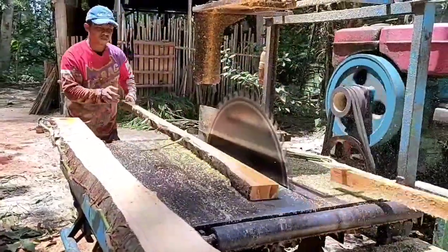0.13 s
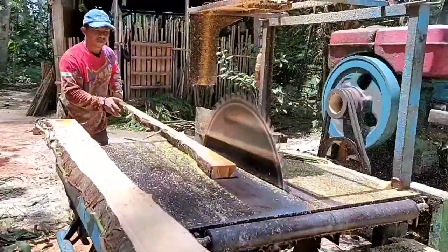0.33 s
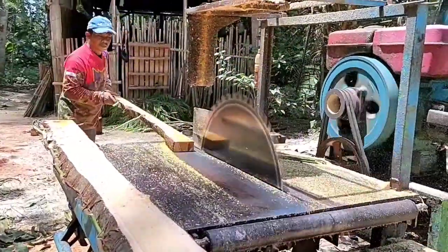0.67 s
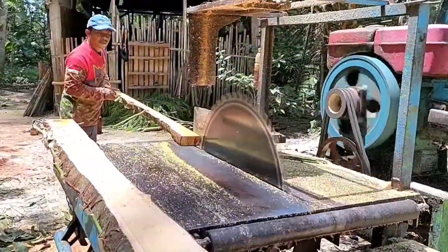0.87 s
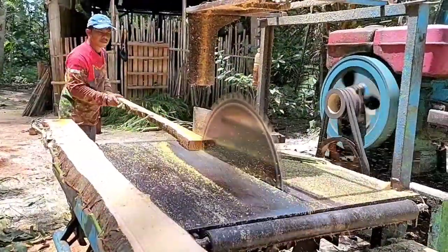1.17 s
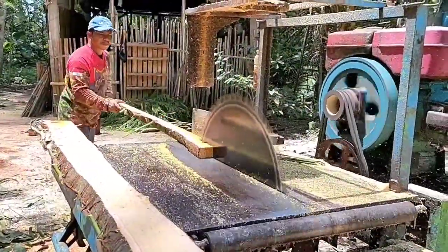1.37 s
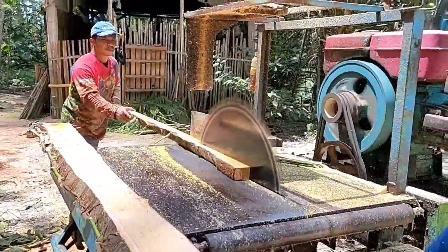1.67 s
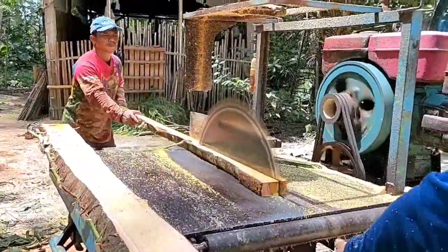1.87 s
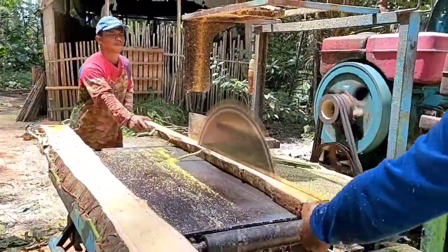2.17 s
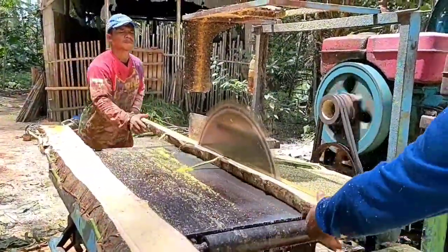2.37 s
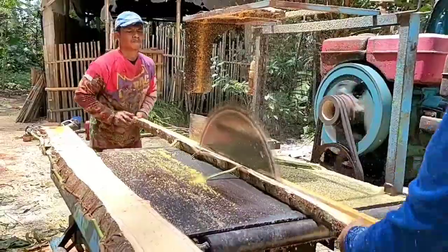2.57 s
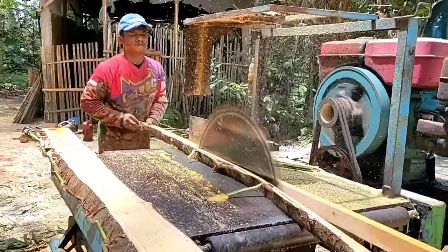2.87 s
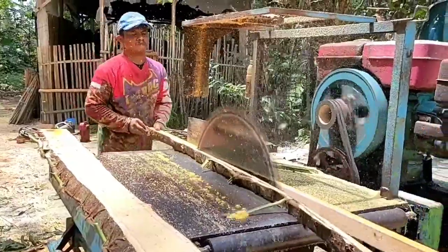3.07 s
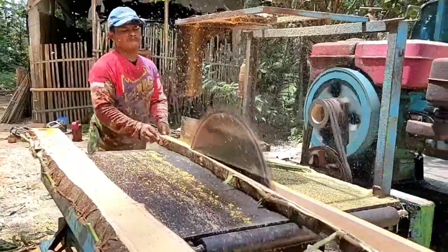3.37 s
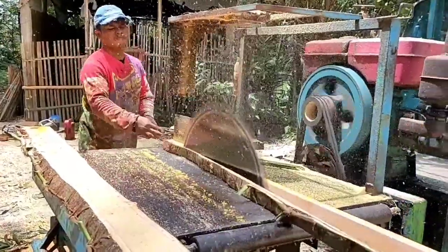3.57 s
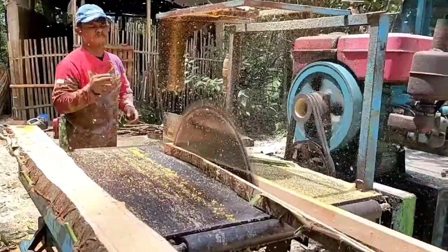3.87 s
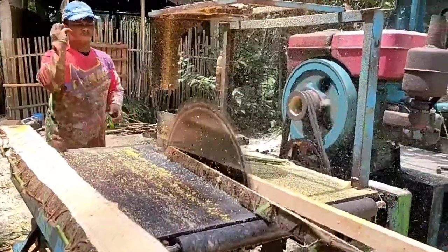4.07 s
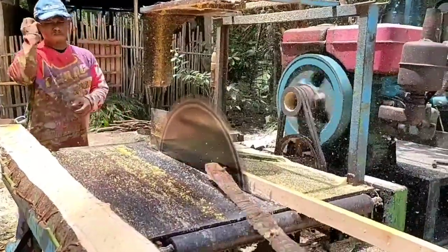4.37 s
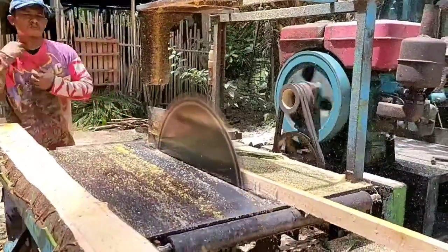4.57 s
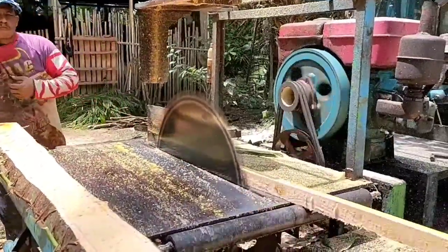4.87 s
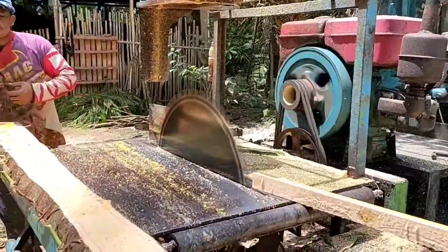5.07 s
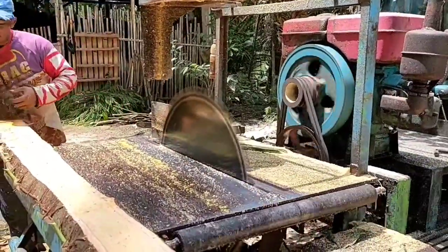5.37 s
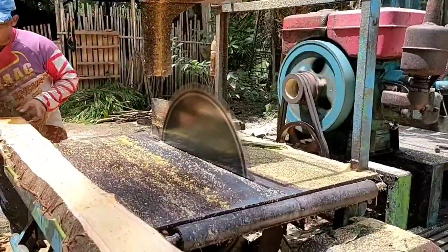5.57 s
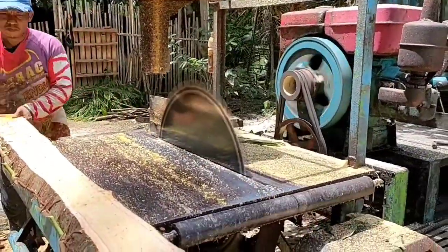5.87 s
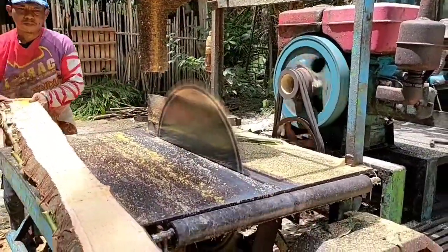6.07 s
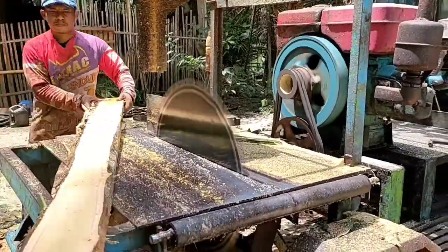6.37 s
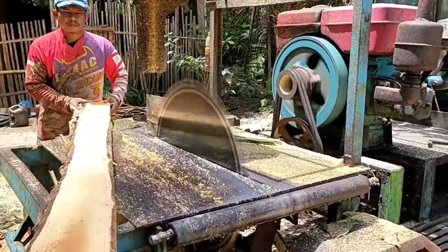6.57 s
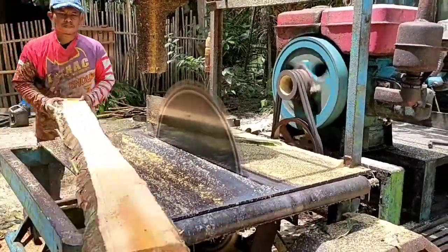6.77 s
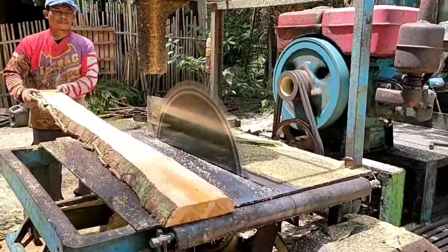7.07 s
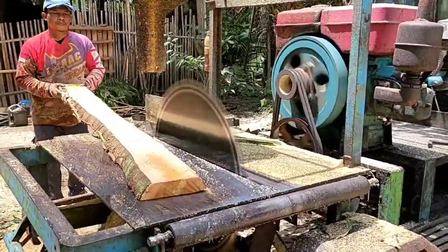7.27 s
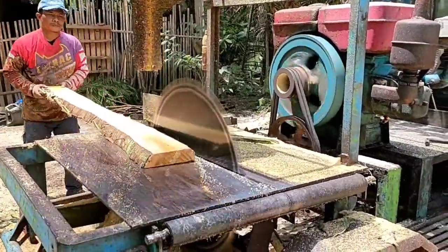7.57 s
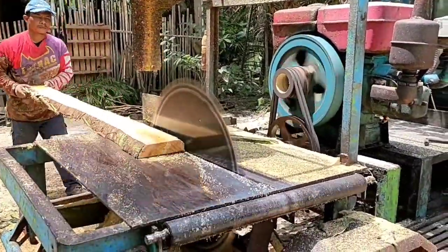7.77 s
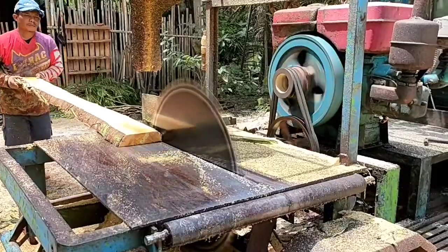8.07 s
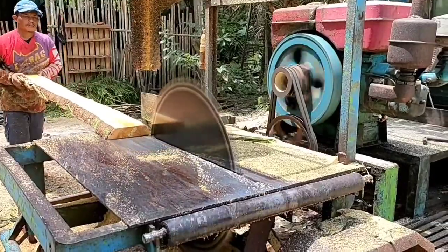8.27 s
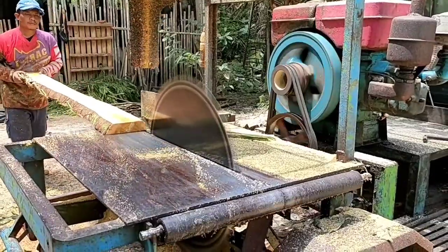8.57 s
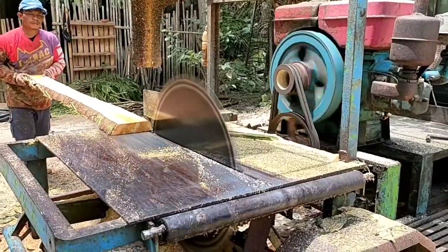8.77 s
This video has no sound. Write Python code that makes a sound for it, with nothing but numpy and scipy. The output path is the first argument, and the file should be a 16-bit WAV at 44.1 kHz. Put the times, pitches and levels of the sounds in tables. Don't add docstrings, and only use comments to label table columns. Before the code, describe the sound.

Open-air sawmill: hollow exhaust puffs and sharp pops, a harsh high saw cut with dusty hiss, then loud engine clatter and plank knocks.

```python
import sys
import numpy as np
from scipy import signal
from scipy.fft import rfft, irfft, next_fast_len
from scipy.io import wavfile
from scipy.ndimage import uniform_filter1d

SR = 44100
rng = np.random.default_rng(int(sys.argv[2]) if len(sys.argv) > 2 else 0)


def pcm_store(signal):
    levels = np.round(np.clip(np.atleast_2d(signal), -1, 1) * 32767)
    wavfile.write(sys.argv[1], SR, levels.astype(np.int16).T)


def makeup_ratio(level_db):
    decades = np.asarray(level_db, float) / 20
    return 10 ** decades


N = 393813
SIZE = next_fast_len(N + 8192)
HZ = np.maximum(np.arange(SIZE // 2 + 1) * SR / SIZE, 1)
LEFT_LAG = 8
CUT_S, ENTER_S, LEAVE_S = (1.36, 3.82), 0.023, 0.14
# start_s, bite_level_db
FEED = [(1.36, -17), (1.41, -16.5), (1.5, -17), (1.72, -18.5), (1.95, -17), (2.25, -19), (2.42, -17.5),
        (3.1, -17), (3.35, -18), (3.5, -19.5), (3.65, -19), (3.82, -18.5)]


def response(points, column=1, rings=()):
    table = np.array(points, float)
    gain_db = np.interp(np.log(HZ), np.log(table[:, 0]), table[:, column])
    for hz, width, db in rings:
        gain_db = gain_db + db / (1 + (2 * (HZ - hz) / width) ** 2)
    cepstrum = irfft(gain_db * np.log(10) / 20, SIZE)
    cepstrum[1:SIZE // 2] *= 2
    cepstrum[SIZE // 2 + 1:] = 0
    return np.exp(rfft(cepstrum))


def stereo(direct, spread, colour, alike_hz, rings=(), least=0.13):
    alike = np.clip(least + (1 - least) / (1 + (HZ / alike_hz) ** 2), 0, 1)
    lag = [np.exp(-2j * np.pi * HZ * LEFT_LAG / SR), 1]
    sides = []
    for c in range(2):
        straight = np.sqrt(alike) * lag[c] * rfft(direct, SIZE)
        echoes = np.sqrt(1 - alike) * rfft(spread[c], SIZE)
        sides.append(response(colour, 1 + c, rings) * (straight + echoes))
    out = irfft(sides, SIZE)[:, :N]
    return out / np.sqrt(np.mean(out ** 2))


def strike(times, gains, shape, lead_s):
    train = np.zeros(N + SR)
    np.add.at(train, np.round(np.asarray(times) * SR).astype(int), gains)
    start = int(lead_s * SR)
    return signal.fftconvolve(train, shape)[start:start + N]


def walk(rate):
    k = int(SR / rate)
    return 1.64 * uniform_filter1d(np.repeat(rng.standard_normal(N // k + 1), k), k)[:N]


def grit(rate, scatter_db):
    chance = rng.random((2, N))
    size = makeup_ratio(-scatter_db * np.log(1 - .999 * chance[1]))
    clicks = (chance[0] < rate / SR) * size * rng.standard_normal(N)
    return clicks / np.sqrt(np.mean(clicks ** 2))


def bump(t, at, width):
    return np.exp(-.5 * ((t - at) / width) ** 2)


def band(x, lo_hz, hi_hz):
    return signal.sosfilt(signal.butter(2, [lo_hz, hi_hz], "band", fs=SR, output="sos"), x)


def held(t, start, end, attack, release):
    return np.interp(t, [start - attack, start, end, end + release], [0, 1, 1, 0])


def firings():
    # start_s, peak_db, crack_above_pop_db, gain_duck_db
    free = [(0.266, -32, 14, -8.5), (5.273, -35, 6, -2), (0.3438, -19.5, 11.5, -2),
            (1.0203, -20, 7.5, -6.5), (4.067, -18.5, 5, -3.5), (4.1403, -18, 9, 3.5),
            (4.591, -13.5, 5.5, -7.5), (4.6532, -16, 6, 4), (5.328, -13, 3, -1), (5.4119, -15.5, 5, -7.5),
            (5.494, -15.5, 0.5, -1.5), (6.0185, -12.5, 2.5, -7.5), (6.096, -13, 6.5, 0),
            (6.156, -13, -1, -6), (6.6863, -14.5, 4, -7.5), (6.7682, -17, 8.5, -6), (7.446, -16, 5.5, -12),
            (7.5196, -15.5, 9, -5.5), (8.1948, -14, 2, -12.5), (8.2773, -15, 11.5, -4.5)]
    # start_s, peak_db, crack_above_pop_db
    loaded = [(1.7104, -23.5, 10), (1.7948, -24.5, 10), (1.934, -31, 5), (2.098, -24, 9),
              (2.1767, -23, 12.5), (2.2378, -27, -11), (2.403, -22, 0), (2.545, -32, 8), (2.629, -20.5, 8),
              (2.699, -36, -4), (2.778, -30, 6), (2.9303, -22.5, 3), (3.159, -22.5, -1), (3.225, -24.5, 11),
              (3.308, -21.5, 10.5), (3.609, -24, 6), (3.6912, -22.5, 8), (3.7546, -23, 8.5)]
    loaded_duck_db = -0.54
    return np.transpose(free + [row + (loaded_duck_db,) for row in loaded])


def gain_control():
    t = np.arange(0, .5, 1 / SR)
    duck = np.clip((t - .008) / 0.009, 0, 1) * np.exp(-(t / 0.13) ** 1.8)
    s, _, _, duck_db = firings()
    return makeup_ratio(0.61 * strike(s, duck_db, duck, 0))


def puffs():
    # first_s, last_s, peak_db
    coasts = [(0.068, .2283, -20), (.451, .451, -20.5), (0.5122, .6759, -19), (0.7446, .9022, -20),
              (0.965, .966, -21), (1.1297, 1.3493, -21), (3.864, 4.0124, -23), (4.236, 4.2354, -19.5),
              (4.316, 4.3918, -15), (4.453, 4.5354, -14.5), (4.758, 4.8412, -18), (4.8959, 5.0612, -15),
              (5.1337, 5.2168, -19), (5.58, 5.7428, -15), (5.807, 5.9628, -15.5), (6.2628, 6.3427, -13),
              (6.4033, 6.569, -15), (6.6312, 6.6304, -15), (6.871, 6.87, -17.5), (6.932, 7.013, -13.5),
              (7.0767, 7.2416, -14), (7.306, 7.3923, -15.5), (7.607, 7.769, -13), (7.845, 7.8438, -16),
              (7.9078, 7.9902, -15), (8.063, 8.144, -15.5), (8.373, 8.373, -14), (8.443, 8.5241, -15),
              (8.588, 8.7479, -16), (8.812, 8.8945, -17)]
    # first_s, last_s, peak_db
    loaded_coasts = [(1.4966, 1.5822, -27.5), (1.639, 1.6398, -27), (1.877, 1.878, -37),
                     (2.0455, 2.0476, -31.5), (2.3465, 2.3473, -25), (2.488, 2.489, -27),
                     (2.848, 2.8475, -24), (3.018, 3.1033, -28.5), (3.409, 3.551, -49)]
    stroke_s = .079
    runs = []
    for first, last, db in coasts + loaded_coasts:
        for s in np.linspace(first, last, round((last - first) / stroke_s) + 1):
            runs.append((s, db))
    s, db = np.transpose(runs)
    return s, db + 1.5 * 20 * np.log10(gain_control()[(s * SR).astype(int)])


def exhaust():
    t = np.arange(-.04, .08, 1 / SR)

    def ring(at, hz, width):
        return bump(t, at, width) * np.cos(2 * np.pi * hz * (t - at))

    def n_wave(at, rise, fall, under):
        return bump(t, at, rise) - under * bump(t, at + 2.62 * rise, fall)

    puff = 1.175 * ring(-0.00018, 257.0, 0.0029) + 0.27 * ring(0.00053, 593, 0.0054)
    puff += 0.23 * n_wave(-0.027, 0.00097, 0.0014, 0.68) - 0.19 * ring(-0.015, 154, 0.0055)
    puff += 0.2 * ring(0.00744, 276, 0.0055) - 0.47 * ring(0.02113, 231, 0.0017)
    puff += 0.07 * ring(0.0103, 97, 0.017)
    pop = n_wave(0, 0.0007, 0.001, 0.95)
    pop += 0.36 * ring(0.0104, 172, 0.002) - 0.085 * ring(0.0185, 180, 0.0028) + 0.31 * ring(0.029, 256, 0.0041)
    pop += 0.095 * ring(0.013, 68, 0.012)
    coast, pops = puffs(), firings()
    both = strike(coast[0], makeup_ratio(coast[1]), puff, .04) + strike(pops[0], makeup_ratio(pops[1]), pop, .04)
    return np.array([makeup_ratio(-1.3) * np.roll(both, LEFT_LAG // 2), makeup_ratio(-2.7) * np.roll(both, -LEFT_LAG // 2)])


def cracks():
    t = np.arange(-.03, .06, 1 / SR)
    burst = np.where(t < .002, bump(t, 0.00081, 0.0011), np.exp(-(t - .002) / 0.0098))
    burst = burst + 0.05 * bump(t, -0.008, 0.0032)
    burst = burst + 0.98 * bump(t, 0.0023, 0.00022)
    s, db, crack_db, _ = firings()
    noise = rng.standard_normal((3, N))
    # pitch_hz, left_db, right_db
    colour = [(307, -21.0, -13), (1230, 1.0, 2.0), (2530, 2.0, 4.0), (4600, 9.0, 8.5),
              (6420, -9.5, -10.0), (14700, -14.0, -20.5)]
    gas = strike(s, makeup_ratio(db + crack_db), burst, .03)
    return makeup_ratio(-4.5) * gas * stereo(noise[0], noise[1:], colour, 3300.0)


def clatter(t):
    # start_s, level_db
    engine = [(0, -26), (.4, -27.5), (.9, -26.5), (1.2, -29), (1.35, -25), (1.5, -36.5), (2.1, -34.5),
              (2.4, -28.5), (3.1, -32.5), (3.6, -30.5), (3.85, -29.5), (4.05, -25.5), (4.24, -24.5),
              (4.35, -20), (4.5, -19.5), (8.93, -19.5)]
    # low_hz, high_hz, before_stroke_s, swell_length_s, swell (ratio), click_share (ratio), flicker_db
    parts = [(124, 453, 0.0016, 0.0065, 0.28, 0.087, 2.5), (459, 865, 0.0025, 0.0065, 0.33, 0.39, 1.3),
             (877, 2010, 0.01, 0.0078, 0.39, 0.41, 1.66), (2130, 3260, 0.0088, 0.0072, 0.17, 0.42, 1.6),
             (3310, 5020, 0.02, 0.0054, 0.61, 0.45, 1.7), (4960, 22000, 0.007, 0.015, 0.24, 0.28, 1.5)]
    # pitch_hz, left_db, right_db
    colour = [(57.3, -13.5, -15.5), (176, -10, -7.5), (296, -5.5, -7), (365, -19, -16.5), (560, -7, -7.5),
              (1287, -6.5, -10.5), (1720, -3.5, -5.5), (2590, -12.5, -11.5), (3180, -10.5, -11),
              (4060, -4, -12), (4540, -13.5, -12.5), (5500, -19.5, -20.5), (7160, -18.5, -18.5),
              (14000, -29, -31)]
    # pitch_hz, width_hz, above_colour_db
    block_rings = [(180, 16, 6), (440, 60, 3.5), (630, 45, 3.5), (771, 48, 4.5), (1060, 39, 6),
                   (1212, 103, 6), (1320, 49, 6), (3625, 56, 10.5), (3870, 39, 4.5), (3970, 100, 4.5),
                   (5810, 53, 9), (6160, 96, 7)]
    around = np.arange(-.06, .06, 1 / SR)
    strokes = np.sort(np.r_[puffs()[0], firings()[0]])
    force = makeup_ratio(1.1 * rng.standard_normal((len(strokes), len(parts))))
    drive = 0
    for k, (lo_hz, hi_hz, lead, length, swell, clicks, flicker_db) in enumerate(parts):
        gate = 1 + strike(strokes, force[:, k], swell * bump(around, -lead, length), 0.058)
        gate = gate * makeup_ratio(flicker_db * walk(40))
        rattle = rng.standard_normal((3, N)) + clicks * grit(1500., 2.1)
        drive = drive + band(gate * rattle, lo_hz, hi_hz)
    level = makeup_ratio(np.interp(t, *np.transpose(engine)))
    return level * stereo(drive[0], drive[1:], colour, 1350.0, block_rings, least=0.38)


def work(t):
    def blend(off, on, share):
        return off + (on - off) * share

    cut, push = held(t, *CUT_S, ENTER_S, LEAVE_S), np.interp(t, *np.transpose(FEED))
    whirr = blend(-52, blend(-18.5, -28, cut), held(t, 0, 3.88, 1, 0.0082))
    graze = -54 + 20 * held(t, CUT_S[0] - ENTER_S, CUT_S[1] + 0.028, 0.26, 0.026)
    spray = -28 + 4 * (push + 18) + 4.5 * bump(t, CUT_S[0] + 0.25, 0.085)
    dust_off_db = -48
    offcut = blend(dust_off_db, -25.5 + .6 * walk(30), held(t, 3.9, 4.2, 0.064, 0.077))
    dust = np.maximum(blend(dust_off_db, spray, cut), offcut)
    return whirr, blend(graze, push, cut), dust


def saw(whirr_db, bite_db, dust_db):
    # pitch_hz, left_db, right_db
    whirr_colour = [(1250, -36, -15.5), (2017, -16, -8.5), (2670, -17, -5), (3320, -44, -1),
                    (4620, -24, -5), (5120, -38.5, -5.5), (6130, -24, -15), (7030, -39, -42),
                    (8600, -22.5, -53), (14040, -42, -58)]
    # pitch_hz, left_db, right_db
    bite_colour = [(1190, -53, -50), (1970, -43, -19), (2850, -60, -6.5), (3300, -66, -3), (3960, -30, -6),
                   (4940, -5.5, 2), (5130, -22, -1), (5570, -23, -13.5), (6650, -50, -34),
                   (14600, -32, -29)]
    # pitch_hz, left_db, right_db
    dust_colour = [(1180, -7, -15.5), (2000, 0, -0.5), (2890, -5, -17), (4040, 6, -22), (4660, 0.5, 3),
                   (5800, 0.5, -2), (6500, -9.5, -12), (8500, -5.5, -10), (10600, -9.5, -19),
                   (11370, -20, -8), (12860, -9, -11.5), (14300, -16, -18.5)]
    # pitch_hz, width_hz, above_colour_db
    plate = [(3590, 34, 5.5), (3730, 43, 3), (4040, 64, 7), (4860, 72, 2), (5100, 64, 8), (4300, 65, 6),
             (4620, 100, 8.5)]
    edges_hz = [600, 2400, 3000, 3400, 3700, 4000, 4200, 4400, 4600, 4800, 5000, 5200, 5500, 6200, 7500, 16000]
    chips = .4 * grit(2000., 1.9)
    drive = 0
    for lo, hi in zip(edges_hz, edges_hz[1:]):
        flicker = makeup_ratio(1.7 * walk(45) + .7 * walk(14))
        drive = drive + band(flicker * (rng.standard_normal((3, N)) + chips), lo, hi)
    layers = [(whirr_db, whirr_colour, plate), (bite_db, bite_colour, plate), (dust_db, dust_colour, ())]
    out = 0
    for k, (db, colour, rings) in enumerate(layers):
        own = np.roll(drive, k * N // 3, axis=1)
        out = out + makeup_ratio(db) * stereo(own[0], own[1:], colour, 1200., rings, least=0.42)
    return out


def mist(t):
    push = np.interp(t, *np.transpose(FEED)) + 18
    db = -45 + 4.4 * push + 11 * bump(t, CUT_S[0] + 0.17, 0.15) + .7 * walk(25)
    noise = rng.standard_normal((3, N))
    return held(t, *CUT_S, ENTER_S, LEAVE_S) * makeup_ratio(db) * band(noise[0] + noise[1:], 7800.0, 15000.)


def taps(events, rise_s, fall_s, trim_db, left_db, rough):
    t, out = np.arange(0, .05, 1 / SR), np.zeros(N + SR)
    shape = (1 - np.exp(-t / rise_s)) * np.exp(-t / fall_s)
    for s, db, hz in events:
        i = int(s * SR)
        out[i:i + len(t)] += makeup_ratio(db + trim_db) * shape / shape.max() * np.sin(2 * np.pi * hz * t)
    rattle = uniform_filter1d(rng.standard_normal((2, N)), size=16, axis=1) * np.sqrt(16)
    out = out[:N] * (1 + rough * rattle)
    return np.array([makeup_ratio(left_db) * np.roll(out[0], LEFT_LAG), makeup_ratio(-left_db) * out[1]])


def engine_taps():
    # start_s, peak_db, pitch_hz
    ticks = [(4.2911, -19, 3850), (4.5795, -13, 4300), (4.7117, -21, 3590), (4.773, -10, 3800),
             (4.8096, -19, 3930), (5.1088, -23, 4040), (5.1934, -21, 3880), (5.3124, -14, 4040),
             (5.3974, -10, 3860), (5.6436, -11, 3800), (5.7982, -7, 3930), (6.0796, -8, 3940),
             (6.2546, -26, 4020), (6.4423, -7, 3910), (6.6064, -12, 3780), (6.755, -13, 4000),
             (6.977, -10, 3900), (7.1008, -4, 3640), (7.193, -10, 3840), (7.2812, -16, 4040),
             (7.3293, -6, 3970), (7.3482, -8, 4010), (7.4245, -5, 3930), (7.4344, -4, 4050),
             (7.867, -19, 4000), (7.8825, -4, 3960), (7.9673, -19, 3880), (8.1225, -13, 3900),
             (8.2626, -12, 3970), (8.418, -21, 3900), (8.4347, -8, 3840)]
    # start_s, peak_db, pitch_hz
    clacks = [(3.6924, -14, 4040), (4.14, -15, 4720), (4.5946, -11, 4240), (5.412, -10, 4100),
              (6.018, -7, 4040), (6.0945, -6, 4420), (6.1552, -6, 3980), (6.6876, -10, 4340),
              (6.77, -6, 4080), (7.4447, -6.5, 4040), (7.5213, -18, 4100), (8.1958, -7.5, 4070),
              (8.278, -17, 4180)]
    # start_s, peak_db, pitch_hz
    clanks = [(4.526, -14, 590), (4.578, -12, 1100), (4.64, -19, 780), (4.721, -11, 763), (4.75, -10, 1285),
              (4.832, -15, 589), (4.898, -10.5, 1060), (5.119, -10, 1190), (5.31, -18, 750),
              (5.382, -20, 1250), (5.476, -18, 750), (5.648, -17, 645), (5.734, -15, 1330),
              (5.796, -11, 1220), (5.879, -14, 1100), (5.909, -13.5, 600), (5.95, -17, 1210),
              (6.101, -19, 1200), (6.136, -11, 750), (6.318, -27, 1160), (6.335, -11.5, 584),
              (6.478, -9, 1220), (6.557, -13, 1210), (6.751, -16, 760), (6.83, -18, 767),
              (6.87, -16.5, 678), (6.93, -16, 598), (7.04, -18, 727), (7.066, -13.5, 1106),
              (7.508, -17, 1110), (7.669, -13, 1040), (7.749, -15, 1060), (7.813, -14, 725),
              (7.882, -11, 1200), (8.06, -17, 1210), (8.195, -12, 1600), (8.261, -18.5, 1260),
              (8.364, -11, 1263), (8.431, -14, 1220), (8.454, -15, 1090), (8.513, -18, 1020),
              (8.669, -11, 600), (8.785, -12, 1230), (8.843, -14, 1190)]
    gear = taps(ticks, 0.00064, .0025, -5.5, 2.3, 0.22) + taps(clacks, .0006, 0.0021, -3.5, 0.77, 0.4)
    return gear + taps(clanks, 0.0023, 0.0058, -6, 0.78, 0.11)


def timber_taps():
    # start_s, peak_db, pitch_hz
    squeals = [(0.0218, -10, 3570), (0.1226, -16, 4700), (0.5494, -11, 3790), (0.5894, -11.5, 4450),
               (0.6194, -12, 3980), (0.6509, -9, 4100), (0.7696, -16, 3800), (0.7994, -10, 3870),
               (0.8544, -14, 3580), (0.8794, -16, 3760), (0.9263, -15, 4080), (1.1598, -20, 4070),
               (1.2216, -13.5, 3640), (1.3713, -13, 4060), (2.5147, -11, 4940), (2.5421, -13, 4620),
               (2.6514, -13, 4660), (3.493, -14, 5000), (3.8407, -18, 5180)]
    # start_s, peak_db, pitch_hz
    thuds = [(2.017, -33, 175), (2.259, -29, 262), (2.313, -28, 80.7), (2.692, -30, 129), (2.794, -29, 272),
             (2.984, -30, 221), (3.067, -32, 86.1), (3.388, -39, 180), (3.477, -41, 215), (3.54, -37, 207)]
    return taps(squeals, 0.0032, 0.008, -8.5, -5.5, 0.26) + taps(thuds, .003, 0.0056, -1.7, .2, .05)


def knocks():
    # start_s, peak_db
    fence_hits = [
        (6.1376, -19),
        (7.102, -22),
        (7.933, -10),
    ]
    # pitch_hz, level_db, decay_s
    modes = [(1390, -7, 0.0044), (1850, -4.0, 0.0022), (2380, 1.5, 0.0025), (3200, 2.0, 0.0025), (4010, 0.0, 0.0024)]
    t = np.arange(0, .04, 1 / SR)
    ring = sum(makeup_ratio(db) * np.exp(-t / tau) * np.sin(2 * np.pi * hz * t) for hz, db, tau in modes)
    ring = ring + .3 * np.roll(ring, 190) + 0.46 * np.roll(ring, 420)
    s, db = np.transpose(fence_hits)
    hit = strike(s, makeup_ratio(db - 6.5), ring, 0)
    return np.array([makeup_ratio(3.5) * np.roll(hit, 2), makeup_ratio(4.0) * hit])


def slide(t):
    rasp = makeup_ratio(2.2 * walk(30)) * (rng.standard_normal((2, N)) + 0.61 * grit(900., 2.5))
    return held(t, 6.98, 7.9, 0.051, 0.14) * makeup_ratio(-31 + 12) * band(rasp, 2270.0, 4100.0)


def rumble():
    # start_s, width_s, level_db
    surges = [
        (.15, 0.075, 3),
        (1.03, 0.12, -9.5),
        (2.36, 0.47, 8.5),
        (7.7, 0.28, 1.5),
        (8.75, 0.34, 6),
    ]
    t = np.arange(N) / SR
    db = -38.5 - 17 * held(t, CUT_S[0] + 0.17, CUT_S[1] - .15, 0.16, 1)
    db = db + sum(up * bump(t, s, w) for s, w, up in surges)
    mid, side = band(rng.standard_normal((2, N)), 22.0, 149.0) * makeup_ratio(1.1 * walk(11))
    both = np.array([mid + .12 * side, mid - .12 * side])
    return makeup_ratio(db + 2.5) * both / np.sqrt(np.mean(mid ** 2))


def scene():
    t = np.arange(N) / SR
    heard = cracks() + clatter(t) + saw(*work(t)) + mist(t) + slide(t) + rumble()
    return heard * gain_control() + exhaust() + engine_taps() + timber_taps() + knocks()


def top_cut(x):
    return signal.sosfilt(signal.butter(12, 15500, fs=SR, output="sos"), x)


def record(dry):
    # pitch_hz, level_db
    mic = [(25, 3.5), (50, 2), (6900, -1.5), (7400, -7.5), (7750, -7.5), (8050, -9), (8500, -9.5),
           (11300, -6.5), (11900, -15), (13500, -2), (14300, -15), (15000, -11), (15500, -52)]
    picked_up = irfft(rfft(dry, SIZE) * response(mic), SIZE)[:, :N]
    mix = np.tanh(0.82 * picked_up) / 0.81
    return top_cut(mix)


dry = scene()
out = record(dry)
pcm_store(out)
```